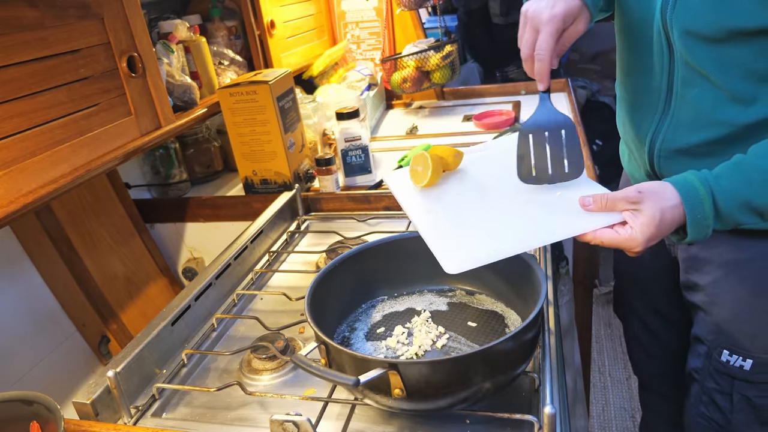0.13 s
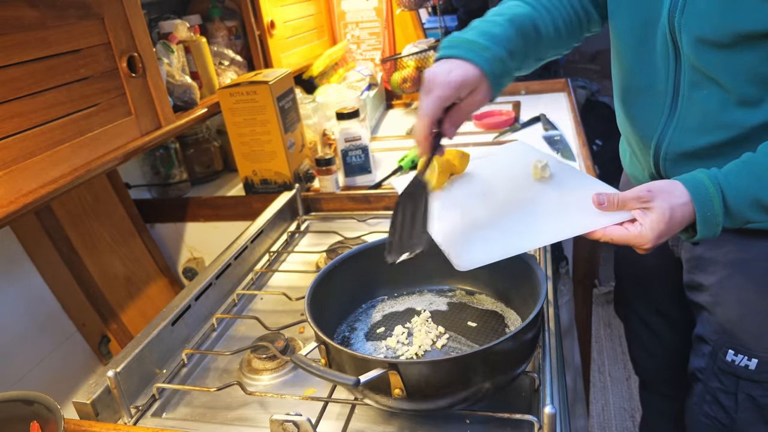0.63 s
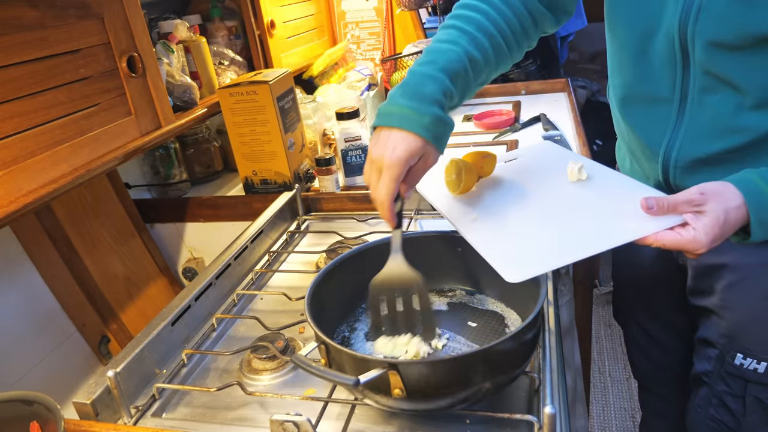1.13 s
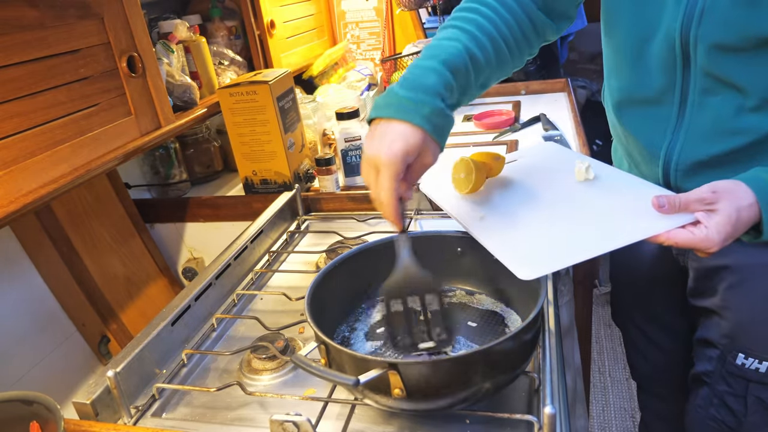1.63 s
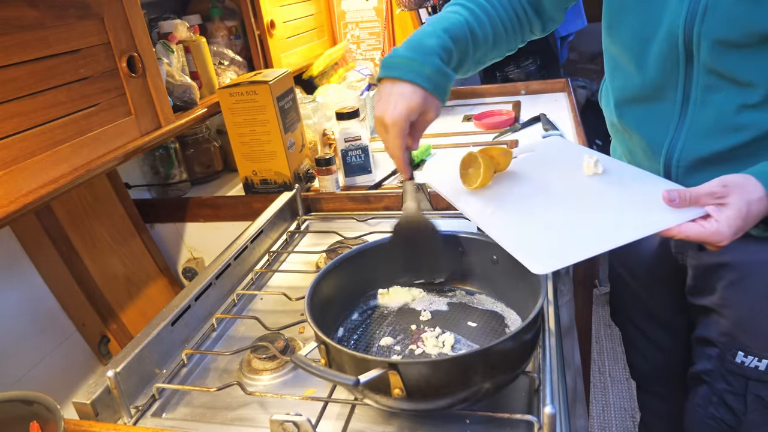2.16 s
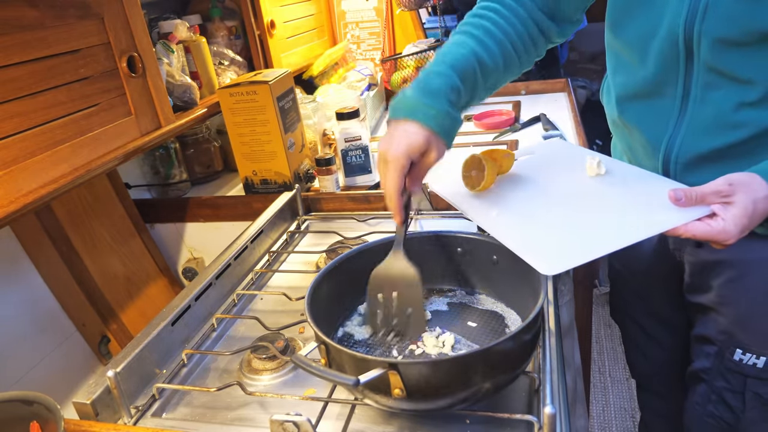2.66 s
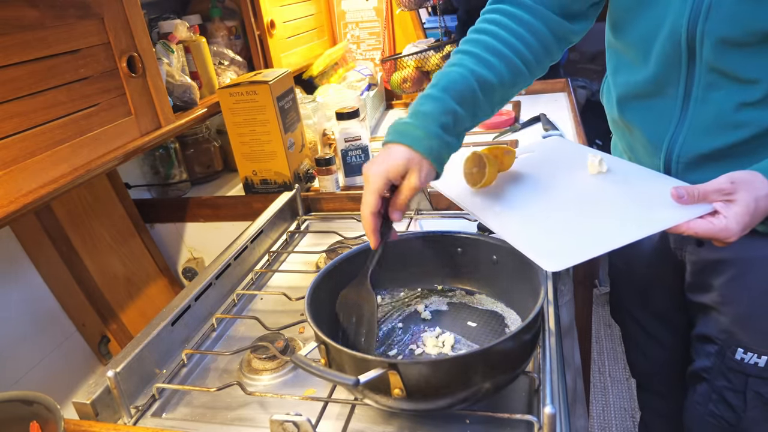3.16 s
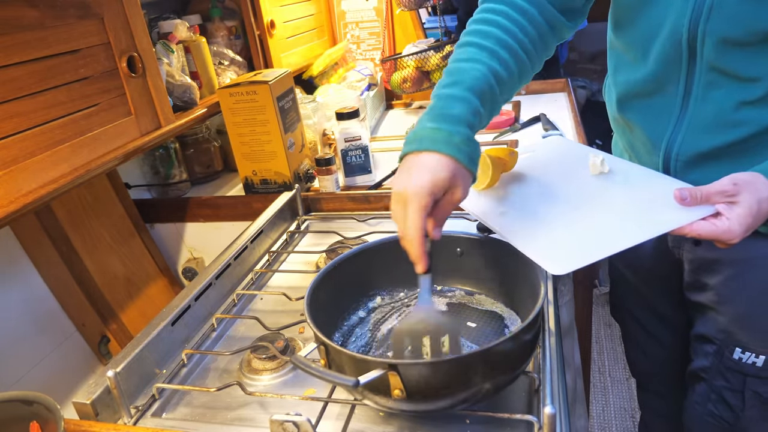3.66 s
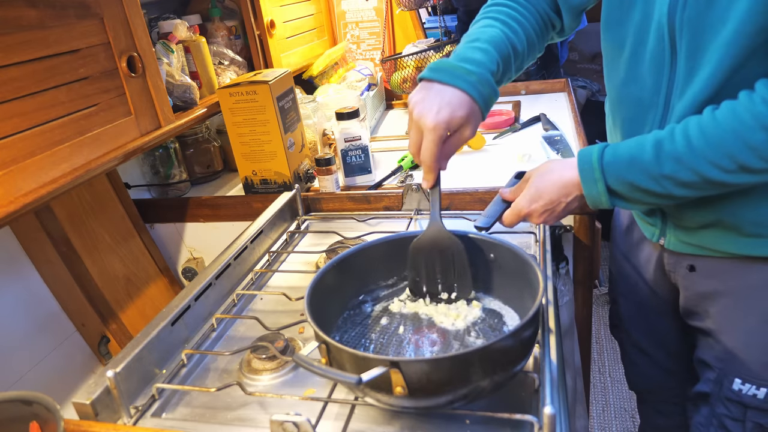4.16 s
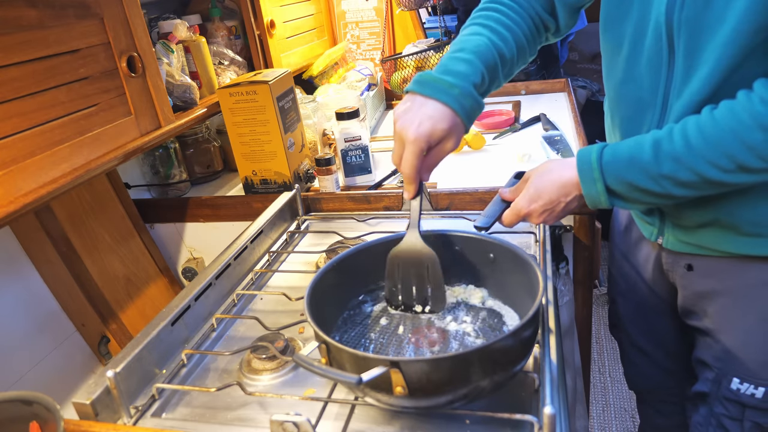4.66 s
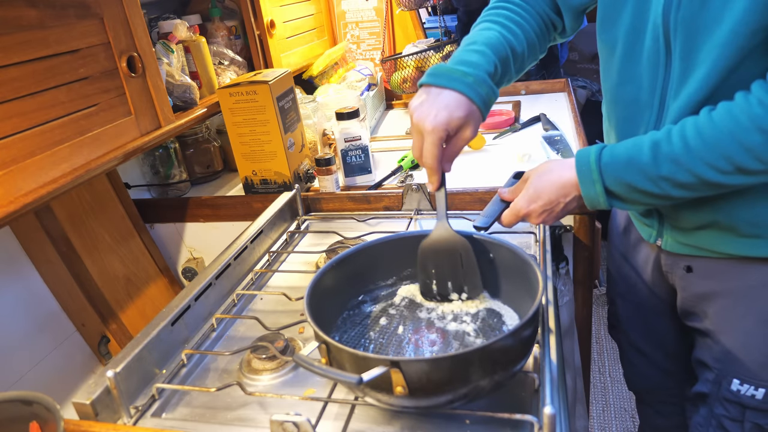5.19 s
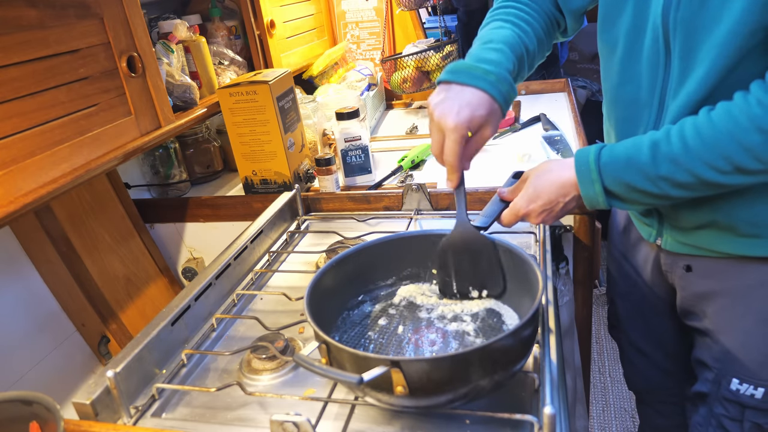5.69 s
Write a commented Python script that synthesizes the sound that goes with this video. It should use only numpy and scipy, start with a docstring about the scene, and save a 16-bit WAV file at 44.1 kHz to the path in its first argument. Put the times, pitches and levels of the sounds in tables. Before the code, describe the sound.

Two or three dull scrapes on a plastic board come first, then a pause with soft sizzle. The spatula clacks, skids and rubs in a frying pan, which rings hollow and shifts on its grate with low thuds. Later the frying turns louder and crackly, with fewer, heavier knocks. Close, nearly centred stereo, short room reflections.

```python
"""A wooden galley: minced garlic sizzles in butter, crackles and spits, while a small motor hums and pips.
A plastic spatula scrapes a cutting board, then taps and scrapes the pan; pan and stove grate ring under it.
Friction and landings are random or short forces driving damped modes; bubbles are shaped noise and clicks;
the motor is a wavering sine and a pulsed one. A close pair of microphones hears it all."""
import sys
import numpy as np
from scipy import signal
from scipy.fft import rfft, irfft, next_fast_len
from scipy.io import wavfile
from scipy.ndimage import uniform_filter1d, map_coordinates

SR = 44100
rng = np.random.default_rng(int(sys.argv[2]) if len(sys.argv) > 2 else 0)


def field_ratio(decibels):
    """Amplitude ratio for a level in dB (20 dB per decade); scalars and array-likes work."""
    return 10 ** (np.asarray(decibels, dtype=float) / 20)


def bounce(signal):
    """Save signal as a 16-bit WAV file at the path given by the first command-line argument."""
    frames = np.transpose(np.atleast_2d(signal))
    limited = np.clip(frames, -1, 1)
    pcm = np.round(limited * 32767).astype(np.int16)
    wavfile.write(sys.argv[1], SR, pcm)


N = 256265  # length in samples

# Levels in the tables are relative unless stated otherwise.
# Spectrum of air and rumble. Each row: frequency in Hz, density in dB per Hz.
AIR_SPECTRUM = [(29, -89), (50, -43), (79, -15.5), (112, -9), (144, -9), (216, -18), (408, -22.5),
                (786, -22.5), (900, -28), (1110, -26), (1400, -23.5), (1700, -28.5), (5000, -38),
                (6500, -68), (11000, -120)]
TURNS_PER_S = 11.85  # motor speed

# Modes of pan and stove on the grate, two for the boom, then three for the knock.
# Each row: frequency in Hz, width in Hz, gain in dB.
GRATE_MODES = [(80, 8.5, -26), (117.7, 43, 28), (198, 26, -0.5), (234, 26.6, 3.5), (299, 39, 2)]
# The pan shifts on the grate. Each row: peak in seconds, boom in dB, knock in dB.
GRATE_SHIFTS = [(1.04, -49.5, -88), (1.52, -54, -57), (1.87, -52.5, -49), (2.26, -75, -49),
                (2.33, -45, -45.5), (2.64, -47.5, -61), (2.93, -41.5, -50), (3.37, -48.5, -56),
                (3.67, -44.5, -53.5), (4.06, -79, -52), (4.145, -41.5, -44), (4.71, -44, -43.5),
                (5.01, -46, -50), (5.29, -53.5, -68), (5.549, -51, -83), (5.81, -45, -40)]
SHIFT_RISE_S, SHIFT_FALL_S = 0.1, 0.22

# Course of the sizzle. Each row: time in seconds, level in dB, its lower part over that in dB.
SIZZLE_COURSE = [(0, -55, -8), (.45, -52.5, 4.5), (.86, -59.5, -4.5), (1.07, -55, -4), (1.25, -46, -4),
                 (1.42, -56.5, -2), (2.3, -54, 3), (2.9, -52.5, 0.5), (3.35, -53, 2.5), (3.89, -52, 2),
                 (3.905, -43.5, 0), (4.22, -47.5, 2), (4.42, -43, 3.5), (4.6, -46, 1.5), (5.0, -46, 0),
                 (5.35, -48, 3), (5.55, -46.5, -2.5), (5.81, -47, 0.5)]
# Spectrum of the bursting bubbles. Each row: frequency in Hz, density in dB per Hz.
FIZZ_SPECTRUM = [(470, -63), (800, -32), (1180, -9.5), (1370, -28), (1550, -23), (1920, -27), (2050, -18.5),
                 (3600, -6.5), (4990, -11), (6820, -1), (7930, -9), (8990, -2.5), (12300, -15),
                 (13900, -15), (15100, -22), (15500, -36), (16000, -40)]
SPLIT_HZ = 5200  # where the lower part of the sizzle ends
SNAPS_PER_S, CRACKLE_DB = 400, -7  # mean rate of snaps, their level over the sizzle
# Fat spits. Each row: start in seconds, peak in dB, pitch in Hz.
FAT_SPITS = [(1.183, -27, 9000), (1.365, -42, 9000), (2.5552, -32, 9300), (2.668, -35, 8000),
             (2.787, -30, 7110), (3.245, -31, 8700), (4.0441, -13.5, 9540), (4.3037, -21, 7200),
             (4.2555, -32, 6500), (4.385, -33, 7200), (4.3206, -30, 6800), (4.5273, -22.5, 6400),
             (4.6374, -29, 6200), (4.8596, -27, 8590), (4.864, -22, 9200), (5.1086, -31, 7100),
             (5.1782, -30, 8650), (5.232, -21, 6900), (5.3128, -20.5, 9500), (5.6152, -27.5, 7100),
             (5.699, -29, 7100)]

# Modes of the pan. Each row: frequency in Hz, width in Hz, gain in dB.
PAN_MODES = [(346, 91, -20.5), (430, 39, -13), (464.6, 25, -10), (499.8, 17.2, -0.5), (526.2, 22.2, 5),
             (615, 67, -11), (673, 95, -10), (825.6, 18, -3.5), (977, 120, -19), (980, 42, -12),
             (1070, 70, -5), (1191, 51, -8), (1284, 63, -10.5), (1538, 125, -13.5), (1835, 45, -2.5),
             (1884, 57, -15), (2059, 43, -11.5), (2425, 93, -11.5), (2565, 57, -5.5), (2710, 98, -16),
             (3000.6, 430, -13.5), (3210, 100, -15.5), (3490, 80, -18), (3630, 83, -18), (3830, 160, -17),
             (4240, 160, -15), (4470, 160, -16.5), (5370, 200, -22.5), (6250, 220, -20), (6520, 200, -14),
             (6870, 180, -15), (7030, 120, -16.5), (7450, 190, -16.5), (8700, 300, -20.5), (9800, 840, -23)]
# Modes of the pan's damped, hollow answer. Each row: frequency in Hz, width in Hz, gain in dB.
BOWL_MODES = [(524, 31, 1), (593, 96, -7), (960, 70, -4), (1110, 170, 3), (1540, 90, -9), (2100, 90, -12),
              (2570, 120, -6)]
# Modes of the cutting board. Each row: frequency in Hz, width in Hz, gain in dB.
BOARD_MODES = [(471, 26, -7.5), (660, 160, -7.5), (677, 60, -10), (850, 80, -11), (1033, 64, -4),
               (1210, 620, 2.5), (1320, 220, -5), (1800, 170, -7.5), (2380, 150, -7.5), (2780, 350, -3),
               (3200, 200, -6), (3900, 200, -11), (5000, 400, -16), (6700, 900, -1), (7400, 260, -30)]
# Limits in Hz of the deep, low, middle and high groups of modes.
GROUP_LIMITS = [300, 750, 1400, 3000, 22050]

# The spatula lands and skids. Each row: time in seconds, crack peak in dB, pan ring in dB,
# skid of the middle modes in dB, skid fall in seconds, hollow knock in dB, crack tilt in dB per octave.
LANDINGS = [(1.036, -70, -39, -81, 0.047, -26, -1), (1.408, -28, -38.5, -48.5, 0.072, -45, 2),
            (1.5045, -28, -41, -47, 0.23, -24, 1), (1.7885, -15.5, -33, -37, 0.032, -24, 1),
            (1.8605, -20.5, -26, -44, 0.02, -18, -10.5), (2.1319, -7, -22.5, -43, 0.015, -26, -3),
            (2.2154, -23, -38, -40.5, 0.13, -50, -5.5), (2.3048, -18.5, -41, -44, 0.028, -50, -4),
            (2.315, -50, -19.5, -48, 0.09, -19, -1), (2.377, -29.5, -30, -45, 0.033, -19, -2),
            (2.625, -16.5, -21, -26.5, 0.048, -30, 2), (2.8707, -5, -27, -30, 0.015, -26, 1.5),
            (2.9733, -15, -33, -38, 0.03, -33, 3), (3.3486, -36, -39, -87, 0.054, -24.5, -1),
            (3.596, -13, -30, -33.5, 0.029, -23, 2.5), (3.645, -47, -44, -78, .03, -35, -1),
            (4.0087, -15, -38, -60, 0.01, -44, -4), (4.0115, -11.5, -29, -55, 0.0061, -40, 5),
            (4.0801, -21, -29, -49, 0.018, -45, 2), (4.1285, -22, -13.5, -32, 0.05, -17, -3.5),
            (4.1575, -26, -30, -40, .03, -24, 0), (4.7034, -22, -10, -36, 0.051, -5, -12.5),
            (4.9406, -14, -38, -45, 0.024, -34, 4.5), (5.0, -35, -22, -40, 0.043, -23, 2),
            (5.0125, -29, -32, -35.5, 0.032, -23.5, 0), (5.7745, -50, -34, -60, .01, -34, -5),
            (5.7845, -28, -15.5, -40, 0.041, -13, -11.5)]
# Spectrum of the landing crack. Each row: frequency in Hz, density in dB per Hz.
CRACK_SPECTRUM = [(590, -82), (1000, -11.5), (1470, -22.5), (2050, -10.5), (3840, 1), (5070, -9), (6860, 4),
                  (8100, -8), (10100, -11), (12500, -30), (14800, -35), (15500, -65)]
CONTACT_S, SOFTEN_DB = 0.00017, 17  # contact time at a 0 dB knock; it doubles for each such loss
SKID_RISE_S, SKID_DEEP_DB, SKID_HISS_DB = 0.0026, -9, -14.5  # deep modes over the ring, hiss over the crack

# A narrow band sings out while the blade drags, from the flexing blade or one mode under it. Each row:
# start in seconds, length in seconds, first pitch in Hz, last pitch in Hz, width in Hz, level in dB.
SINGING_BANDS = [(0.036, 0.03, 2650, 2710, 410, -42), (0.077, .07, 3300, 2710, 410, -50),
                 (.12, 0.067, 3300, 3250, 200, -50), (0.132, 0.076, 1950, 1750, 160, -48.5),
                 (.34, 0.11, 950, 840, 400, -45), (.455, .11, 1080, 1180, 450, -39),
                 (.45, 0.058, 672, 697, 100, -42), (1.085, 0.19, 1845, 1845, 50, -50),
                 (1.5, 0.14, 3700, 3350, 700, -40), (4.128, .022, 3700, 3700, 300, -36),
                 (4.382, .085, 525, 520, 30, -43), (5.0, .035, 3600, 3600, 400, -44),
                 (4.14, .06, 880, 833, 139, -35), (4.135, .05, 1850, 1850, 205, -43),
                 (1.575, 0.071, 1880, 1870, 90, -40.5), (1.61, .07, 841, 830, 40, -48),
                 (1.032, 0.029, 596, 604, 75, -44), (2.372, 0.032, 2200, 1850, 65, -45),
                 (1.095, .19, 535, 515, 55, -45), (1.96, 0.11, 3520, 3300, 91, -36.5),
                 (2.01, 0.096, 2560, 2560, 50, -37), (2.02, 0.065, 1900, 1940, 80, -37.5),
                 (2.05, 0.08, 823, 832, 25, -35), (2.735, 0.09, 825, 825, 30, -43),
                 (3.06, 0.09, 826, 826, 35, -49), (3.035, .1, 505, 500, 50, -38),
                 (2.4, 0.06, 1034, 1056, 50, -43), (3.81, 0.121, 530, 590, 140, -28.5),
                 (3.835, 0.04, 1830, 1850, 200, -38), (3.835, 0.035, 2400, 2400, 260, -38),
                 (5.015, 0.039, 1090, 1057, 120, -38), (2.98, .05, 6700, 6700, 290, -36),
                 (2.215, 0.059, 6600, 6900, 1000, -38.5)]
SING_EDGE_DB = 13  # start and end under the middle

# Hiss of the dragging blade edge. Each row: frequency in Hz, density in dB per Hz.
EDGE_SPECTRUM = [(1470, -14), (2500, -15), (2830, -15), (3520, 0.5), (5070, -7.5), (6810, -4.5),
                 (8100, -16), (9500, -11), (12000, -26), (14500, -28), (15400, -75), (16000, -66)]
# The blade drags over the board. Each row: peak in seconds, rise in seconds, fall in seconds,
# low modes in dB, high modes in dB.
BOARD_STROKES = [(0.038, 0.0015, 0.24, -46.5, -43), (0.055, .008, .015, -46, -38),
                 (.07, .03, 0.25, -55, -47.5), (0.303, 0.0085, 0.053, -37.5, -72),
                 (.4, 0.12, 0.1, -43.5, -68), (0.525, 0.19, 0.06, -39, -43)]
BOARD_DEEP_DB, BOARD_HISS_DB = -2, -0.5  # deep modes over the low ones, edge hiss over the high ones
# The blade drags over the pan. Each row: peak in seconds, length in seconds, deep modes in dB,
# middle modes in dB, edge hiss in dB.
PAN_STROKES = [(1.157, 0.42, -50.5, -59.5, -82), (1.916, 0.38, -50, -52, -49),
               (1.617, 0.13, -34.5, -32, -37), (1.994, 0.29, -51, -36.5, -32.5),
               (2.061, 0.15, -32.5, -31.5, -38), (2.241, 0.045, -47, -60, -38),
               (2.357, 0.13, -33, -36.5, -39.5), (2.73, 0.11, -35, -32.5, -33.5),
               (2.903, 0.091, -39, -58, -46), (3.023, 0.2, -76, -47, -34), (3.068, 0.36, -41, -55.5, -56),
               (3.41, 0.13, -43, -37, -39.5), (3.646, 0.089, -35.5, -74, -50),
               (3.864, 0.41, -35.5, -30.5, -32), (4.154, 0.12, -34.5, -38, -40),
               (4.767, 0.12, -35.5, -47, -47), (4.425, 0.2, -52, -58, -48),
               (5.027, 0.11, -39.5, -43.5, -45), (5.526, 0.13, -61, -58, -45.5)]
RISE_SHARE = 0.53  # of a pan drag's length
FADE_DB, ROUNDNESS = 30.5, 1.38  # loss over one rise or fall time, roundness of a pan drag's top
DRAG_MIX, SKID_MIX, LOW_DB = 0.43, 0.64, -1.5  # share of the deep level in the low modes, then their offset

# Reverberation of the walls. Each row: frequency in Hz, time to fall 60 dB in seconds.
WALL_DECAY = [(200, 0.37), (1500, 0.15), (8000, 0.12)]
DIP_S, DIP_DB = 3.8975, -28  # spatula and spits dip briefly
# Likeness of the two ports. Each row: frequency in Hz, left-right likeness from 0 to 1.
PORT_LIKENESS = [(640, 0.99), (1200, 0.9), (3100, 0.94), (6800, 0.97), (9500, 1), (12500, 0.8),
                 (15000, 0.7)]
# Balance of the two ports. Each row: frequency in Hz, left over right in dB.
PORT_BALANCE = [(650, 0), (950, -1.5), (2380, -2.0), (5980, -1.5), (15000, -1)]
# Hiss of the ports. Each row: frequency in Hz, density in dB per Hz.
PORT_HISS = [(8000, -40), (11000, 0), (13500, -3), (15100, -4), (15600, -25)]
PORT_HISS_DB = -70.5  # rms before the band limits


def unit(x):
    """Normalization: x at rms 1."""
    return x / np.sqrt(np.mean(x ** 2) + 1e-20)


def along(points, hz):
    """Interpolation of (Hz, value) points on a logarithmic frequency axis."""
    f, v = np.transpose(points)
    return np.interp(np.log(hz + 1), np.log(f + 1), v)


def wobble(rate):
    """Slow random modulation: a smooth curve through a given number of knots a second."""
    knots = rng.standard_normal(int(N * rate / SR) + 4)
    return map_coordinates(knots, [np.arange(N) * rate / SR])


def filtered(x, response):
    """Linear filtering: the spectrum of x times a complex response of frequency."""
    m = next_fast_len(N + SR // 2)
    return irfft(rfft(x, m) * response(np.fft.rfftfreq(m, 1 / SR)), m)[..., :N]


def ringing(modes):
    """Modal superposition: causal resonances summed with alternating signs."""
    def mode(f, k, centre, width, db):
        return (-1) ** k * field_ratio(db) * 1j * f * width / (centre * centre - f * f + 1j * f * width)
    return lambda f: sum(mode(f, k, *row) for k, row in enumerate(modes))


def power(response):
    """Mean power gain of a response for white noise."""
    return np.mean(abs(response(np.linspace(1, SR / 2, 8000))) ** 2)


def grit(rate, spread_db):
    """Shot noise: random impulses, rate a second, a few of them much larger."""
    chance, size = rng.random((2, N))
    boost_db = np.minimum(-spread_db * np.log(1 - size), 9)
    return (chance < rate / SR) * rng.standard_normal(N) * field_ratio(boost_db)


def swells(rows, roundness=1):
    """Envelopes: rows (peak s, rise s, fall s, dB, ..) summed to one gain curve for each dB column."""
    t, gains = np.arange(N) / SR, 0
    for s, rise, fall, *dbs in rows:
        away = abs(t - s) / np.where(t < s, abs(rise) + 1e-4, abs(fall) + 1e-4)
        gains = gains + np.outer(field_ratio(np.array(dbs)), field_ratio(-FADE_DB * away ** roundness))
    return gains


def tail(t60, size):
    """Diffuse reverberation: noise whose frequencies decay at their own speeds, energy 1."""
    hz, t, z = signal.stft(rng.standard_normal(size), SR, nperseg=256)
    x = signal.istft(z * field_ratio(-60 * t / along(t60, hz)[:, None]), SR, nperseg=256)[1]
    return x / np.linalg.norm(x)


def galley():
    """Broadband air and rumble, with the motor's wavering hum near its twelfth order and a pip once a turn."""
    t = np.arange(N) / SR
    air = unit(filtered(rng.standard_normal(N), lambda hz: field_ratio(along(AIR_SPECTRUM, hz))))
    air *= field_ratio(-61.5 + 0.22 * wobble(4.1))
    hum_level = field_ratio(-60.5 + 2.9 * wobble(39))
    hum = hum_level * np.sin(2 * np.pi * np.cumsum(143 + 6 * wobble(16)) / SR)
    since_turn = ((t - .722) * TURNS_PER_S % 1) / TURNS_PER_S
    pip_shape = np.sin(np.pi * np.clip(since_turn / 0.022, 0, 1))
    pip = field_ratio(-62.5 + 1.5 * wobble(13)) * np.sin(2 * np.pi * 2690 * t) * pip_shape
    return air + hum + pip


def grate():
    """Forced vibration: pan and stove rock under the pressure, with a boom and a higher knock."""
    gains = swells([(s, SHIFT_RISE_S, SHIFT_FALL_S, boom, knock) for s, boom, knock in GRATE_SHIFTS])
    out = np.zeros(N)
    for gain, modes in zip(gains, (GRATE_MODES[:2], GRATE_MODES[2:])):
        twice = lambda hz: ringing(modes)(hz) ** 2  # squared for steeper skirts
        out += filtered(gain * rng.standard_normal(N), twice) / np.sqrt(power(twice))
    return out


def sizzle():
    """Dense random superposition: steam bubbles burst by the thousand in the butter, in patches."""
    s, db, lower_db = np.transpose(SIZZLE_COURSE)
    t = np.arange(N) / SR
    bed = unit(rng.standard_normal(N)) + 0.4 * unit(grit(1000, spread_db=2))
    # patches: a smooth random field over frequency and time
    z = signal.stft(bed, nperseg=256)[2]
    field = uniform_filter1d(rng.standard_normal(z.shape), size=8, axis=0)
    field = uniform_filter1d(field, size=16, axis=1)
    bed = signal.istft(z * field_ratio(1.87 * unit(field)), nperseg=256)[1][:N]
    bed = unit(filtered(bed, lambda hz: field_ratio(along(FIZZ_SPECTRUM, hz))))
    lower = filtered(bed, lambda hz: 1 / (1 + (hz / SPLIT_HZ) ** 8))
    bed = bed + lower * (field_ratio(np.interp(t, s, lower_db)) - 1)
    flicker_db = 1.1 * wobble(14) + 1.3 * wobble(120)
    return bed * field_ratio(np.interp(t, s, db) + flicker_db)


def crackle():
    """Sparse shot noise: small bubbles snap, brighter than the sizzle and as loud as the butter is busy."""
    s, db, _ = np.transpose(SIZZLE_COURSE)
    t = np.arange(120) / SR
    snap = rng.standard_normal(len(t)) * field_ratio(-60 * t / .002)
    snaps = np.convolve(grit(SNAPS_PER_S, spread_db=3), snap)[:N]
    bright = lambda hz: field_ratio(1.25 * along(FIZZ_SPECTRUM, hz)) * hz ** 4 / (hz ** 4 + 5000 ** 4)
    return unit(filtered(snaps, bright)) * field_ratio(np.interp(np.arange(N) / SR, s, db) + CRACKLE_DB)


def spits():
    """Damped oscillation: a larger bubble bursts with a click, a short ring and a puff of spray."""
    out, t = np.zeros(N + SR), np.arange(500) / SR
    for (s, db, hz), noise in zip(FAT_SPITS, rng.standard_normal((len(FAT_SPITS), len(t)))):
        ring = np.sin(2 * np.pi * hz * t) * field_ratio(-60 * t / 0.0041)
        spray = 0.18 * noise * field_ratio(-60 * t / 0.017)
        out[round(s * SR):][:len(t)] += field_ratio(db + 2.0) * (ring + spray)
    return filtered(out[:N], lambda hz: 1 / (1 + (hz / 14000) ** 4) * hz ** 4 / (hz ** 4 + 4500 ** 4))


def singing():
    """Narrow-band noise: a carrier at the gliding pitch, wandering at the speed of the chosen width."""
    out = np.zeros(N)
    for s, size, first_hz, last_hz, width, db in SINGING_BANDS:
        u = np.linspace(0, 1, round(size * SR))
        knots = rng.standard_normal((2, 200))
        drift = map_coordinates(knots, [[0 * u, 0 * u + 1], [u * size * width + 2] * 2])
        phase = 2 * np.pi * np.cumsum(first_hz + (last_hz - first_hz) * u) / SR
        band = drift[0] * np.cos(phase) + drift[1] * np.sin(phase)
        out[round(s * SR):][:len(u)] += field_ratio(db - SING_EDGE_DB * (2 * u - 1) ** 4) * band
    return out


def taps():
    """Impact excitation: each landing cracks sharply and softly pushes the pan's modes and its hollow."""
    crack, push, knock = np.zeros((3, N + SR))
    t = np.arange(2600) / SR
    hz = np.fft.rfftfreq(len(t), 1 / SR)
    noises = rng.standard_normal((len(LANDINGS), len(t)))
    for (s, db, ring_db, _, _, knock_db, tilt_db), noise in zip(LANDINGS, noises):
        i = round(s * SR)
        fall = 2.0 * field_ratio(-60 * t / 0.0038) + 0.85 * field_ratio(-60 * t / 0.027) + 0.071 * field_ratio(-60 * t / 0.079)
        burst = np.roll(np.sign(noise) * fall, 100)  # room for the tilt filter to spread ahead
        tilt = field_ratio(tilt_db * np.log2(np.clip(hz, 1000, 14000) / 5000))
        crack[i - 100:][:len(t)] += field_ratio(db - 12) * irfft(rfft(burst) * tilt, len(t))
        blow = t / 0.00032 * np.exp(-t / 0.00025) * (1 + 0.064 * noise[::-1])
        push[i:][:len(t)] += field_ratio(ring_db + 23.5) * blow
        contact = CONTACT_S * 2 ** (-knock_db / SOFTEN_DB)  # weaker knocks are softer
        knock[i:][:len(t)] += field_ratio(knock_db + 22.0) * t / contact * np.exp(-t / contact) * CONTACT_S / contact
    below_high = ringing([m for m in PAN_MODES if m[0] < GROUP_LIMITS[-2]])
    cracks = filtered(crack[:N], lambda hz: field_ratio(along(CRACK_SPECTRUM, hz) + 5.5))
    return cracks + filtered(push[:N], below_high) + filtered(knock[:N], ringing(BOWL_MODES))


def board_strokes():
    """Friction envelopes on the board: gains of the deep, low and middle modes and of high modes with hiss."""
    return swells([(s, rise, fall, low + BOARD_DEEP_DB, low, high, high + BOARD_HISS_DB)
                   for s, rise, fall, low, high in BOARD_STROKES])


def pan_strokes():
    """Friction envelopes in the pan, same groups: every drag swells and fades, every landing skids away."""
    drags = [(s, RISE_SHARE * size, (1 - RISE_SHARE) * size, *dbs, DRAG_MIX)
             for s, size, *dbs in PAN_STROKES]
    skids = [(s + SKID_RISE_S, SKID_RISE_S, fall, ring + SKID_DEEP_DB, middle, crack + SKID_HISS_DB, SKID_MIX)
             for s, crack, ring, middle, fall, *_ in LANDINGS]
    # the low modes lie between the deep and the middle ones
    spread = lambda rows: [(s, rise, fall, deep, middle + mix * (deep - middle) + LOW_DB, middle, hiss)
                           for s, rise, fall, deep, middle, hiss, mix in rows]
    return swells(spread(drags), ROUNDNESS) + swells(spread(skids))


def rub(gains, modes, shift_db, hiss_db):
    """Friction excitation: the edge catches on fine grit and sets of modes answer, swelling in turn."""
    out = np.zeros(N)
    for gain, lo, hi in zip(gains, GROUP_LIMITS, GROUP_LIMITS[1:]):
        group = [m for m in modes if lo <= m[0] < hi]
        layers = [ringing(group[k::4]) for k in range(min(4, len(group)))]
        if hi == GROUP_LIMITS[-1]:
            layers.append(lambda hz: field_ratio(along(EDGE_SPECTRUM, hz) + hiss_db))
        # the sets trade energy, their sum stays
        share = np.array([field_ratio(shift_db * wobble(8)) for _ in layers])
        weight = np.array([power(layer) for layer in layers])
        share /= np.sqrt(weight @ share ** 2)
        drives = [unit(grit(4000, spread_db=2.0)) * part * field_ratio(2.43 * wobble(70)) for part in share]
        answer = sum(filtered(drive * gain, layer) for drive, layer in zip(drives, layers))
        # plastic is a soft driver
        soft = lambda hz: 1 / (1 + 1j * hz / (2.03 * hi)) ** 2 * (1j * hz / (1j * hz + 0.46 * lo)) ** 2
        out += filtered(answer, soft)
    return out


def ports(near):
    """Partial coherence: two ports hear nearly the same sound, the right mostly a little louder."""
    z = signal.stft(near, nperseg=128)[2]
    scrambled = z * np.exp(2j * np.pi * rng.random(z.shape))
    stray = 1.88 * signal.istft(scrambled, nperseg=128)[1][:N]  # scattered round the microphones' body
    turn = lambda hz: np.arccos(np.clip(along(PORT_LIKENESS, hz), -1, 1)) / 2
    parts = lambda hz: np.array([np.cos(turn(hz)), np.sin(turn(hz)) / (1 + (450 / (hz + 1)) ** 3)])
    mid, side = filtered(np.array([near, stray]), parts)
    balance = lambda hz: field_ratio(np.outer([.5, -.5], along(PORT_BALANCE, hz)))
    return filtered(np.array([mid + side, mid - side]), balance)


def scene():
    """Superposition: walls answer the spatula and spits; the other sources join before the two ports."""
    board = rub(board_strokes(), BOARD_MODES, shift_db=2.5, hiss_db=-4.5)
    pan = rub(pan_strokes(), PAN_MODES, shift_db=3.5, hiss_db=-11.5)
    struck = board + pan + singing() + taps() + spits()
    wet = struck + field_ratio(-9.0) * signal.fftconvolve(struck, tail(WALL_DECAY, size=SR // 3))[:N]
    dip_times = [DIP_S, DIP_S + .002, DIP_S + .1, DIP_S + .105]
    dip_db = np.interp(np.arange(N) / SR, dip_times, [0, DIP_DB, DIP_DB, 0])
    return ports(wet * field_ratio(dip_db) + grate() + sizzle() + crackle() + galley())


def low_pass(x):
    """Removes everything above the highest recorded frequency."""
    return signal.sosfilt(signal.butter(12, 16500, fs=SR, output="sos"), x)


def record(dry):
    """Band limiting: each port adds a thin hiss of its own, then deep bass and extreme treble are cut."""
    band = lambda hz: (1j * hz / (1j * hz + 30)) ** 6 * (hz < 16300)
    hiss = unit(filtered(rng.standard_normal(dry.shape), lambda hz: field_ratio(along(PORT_HISS, hz))))
    return low_pass(filtered(dry + field_ratio(PORT_HISS_DB) * hiss, band))


dry = scene()
out = record(dry)
bounce(out)
```